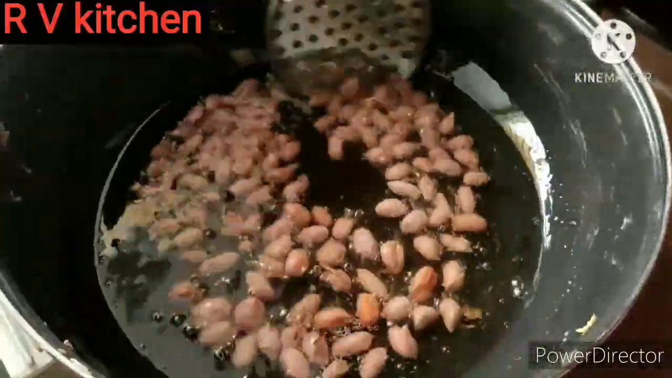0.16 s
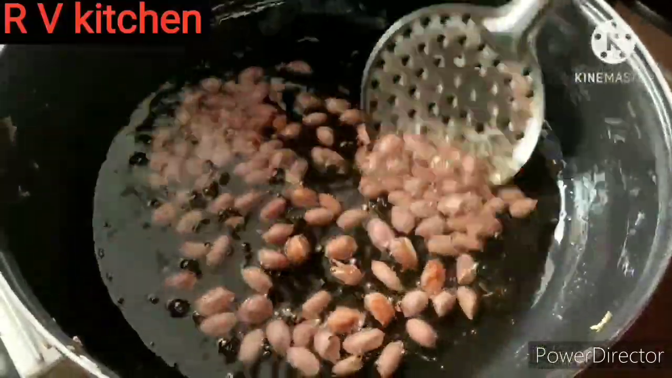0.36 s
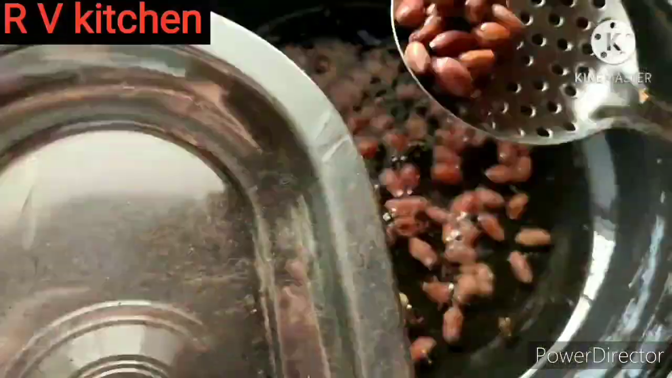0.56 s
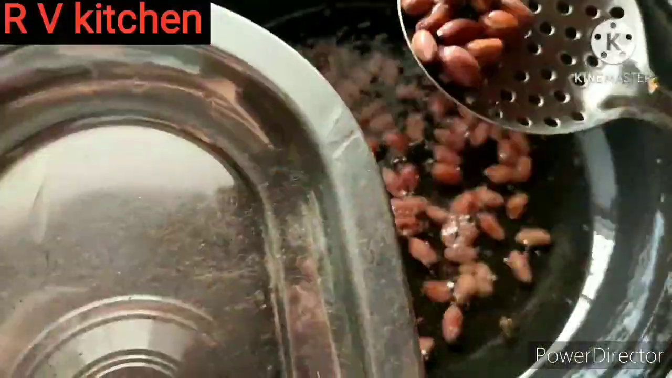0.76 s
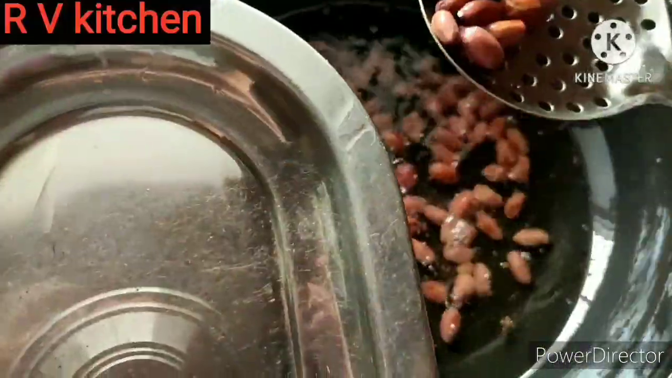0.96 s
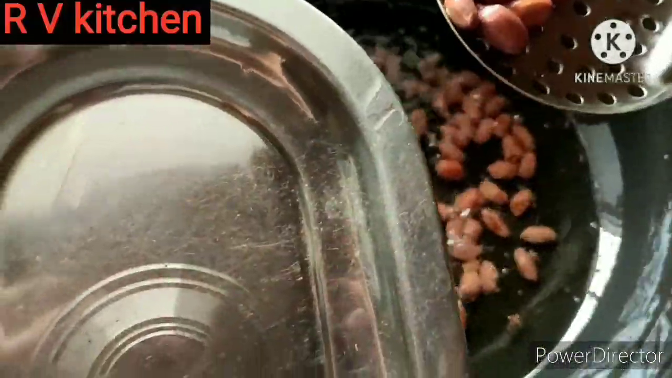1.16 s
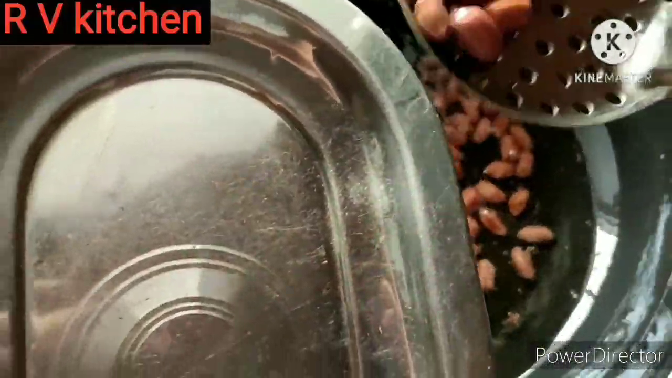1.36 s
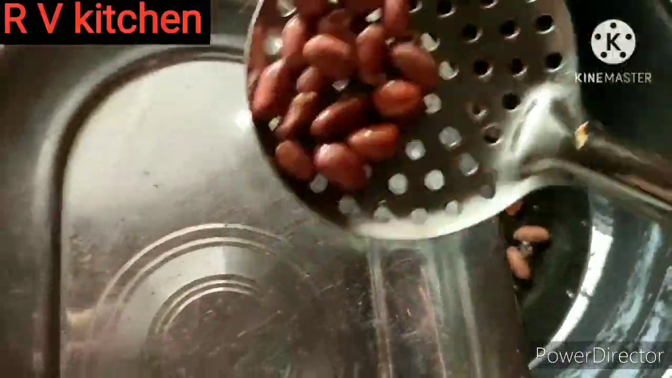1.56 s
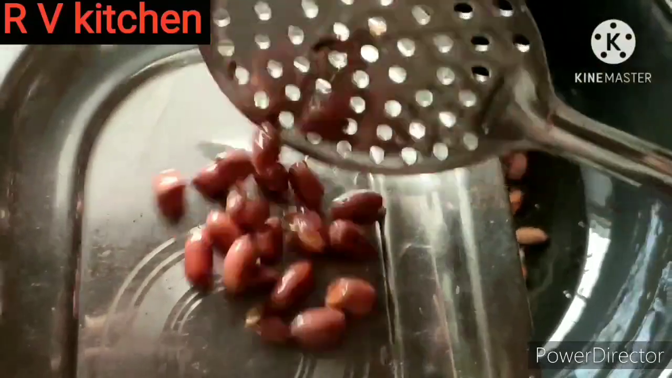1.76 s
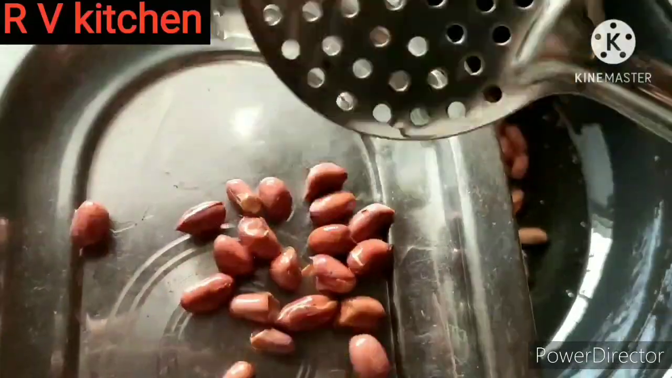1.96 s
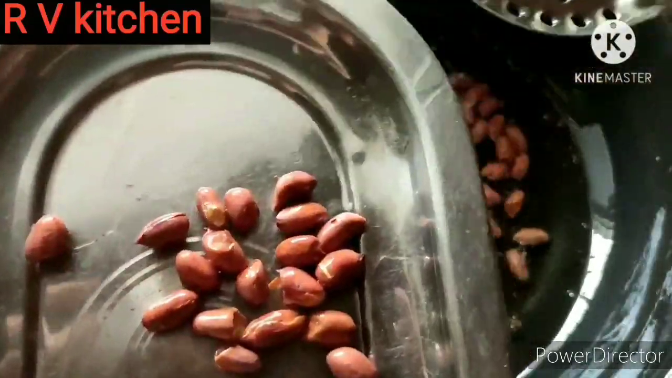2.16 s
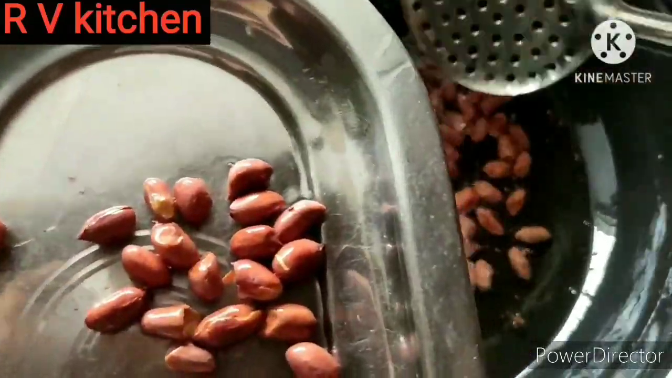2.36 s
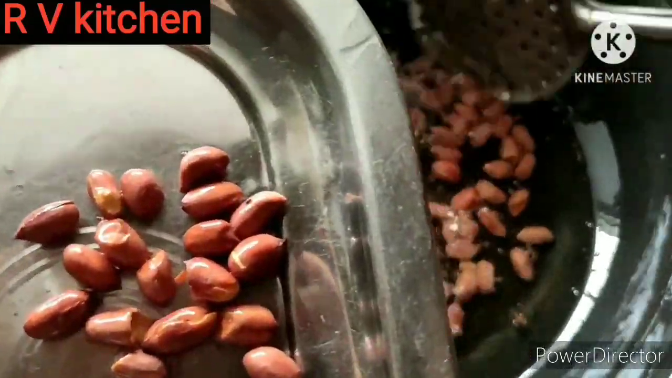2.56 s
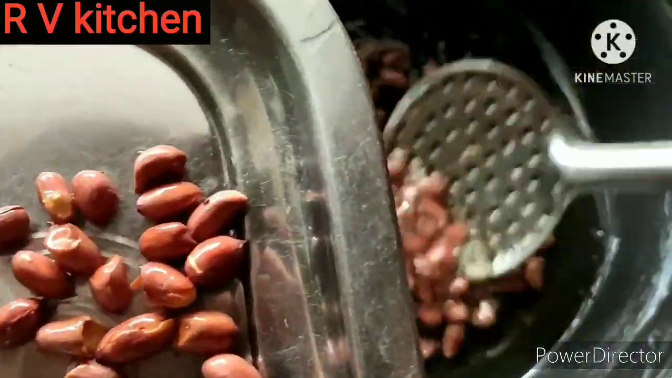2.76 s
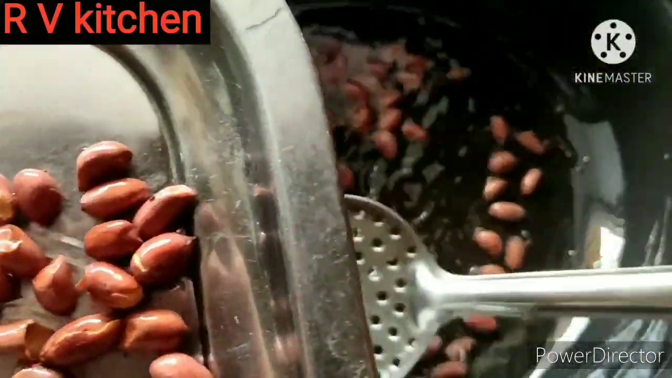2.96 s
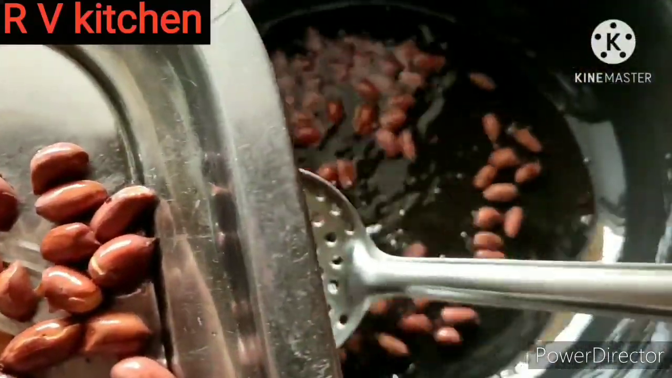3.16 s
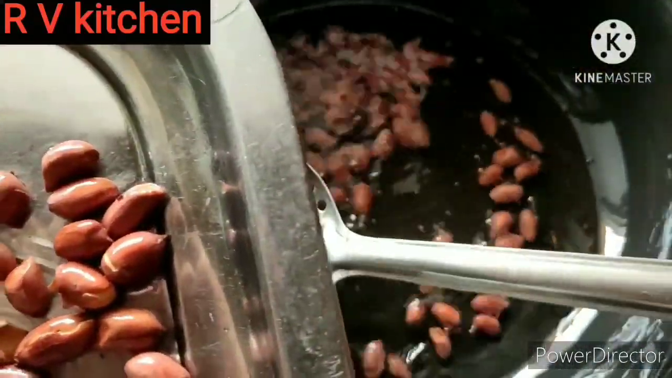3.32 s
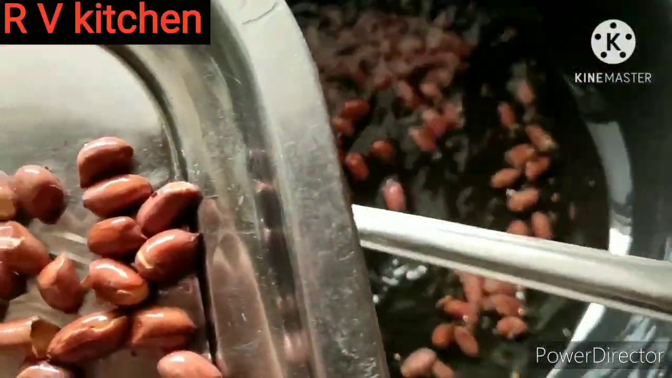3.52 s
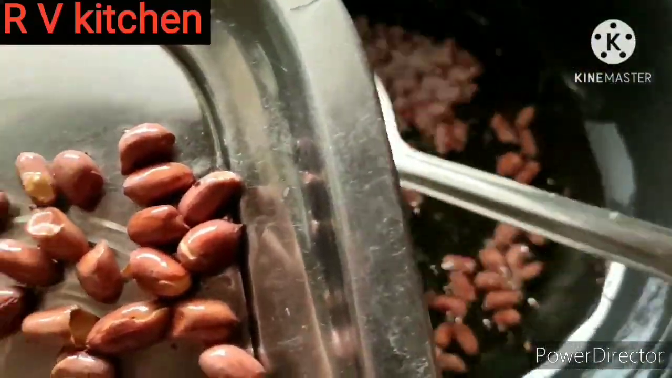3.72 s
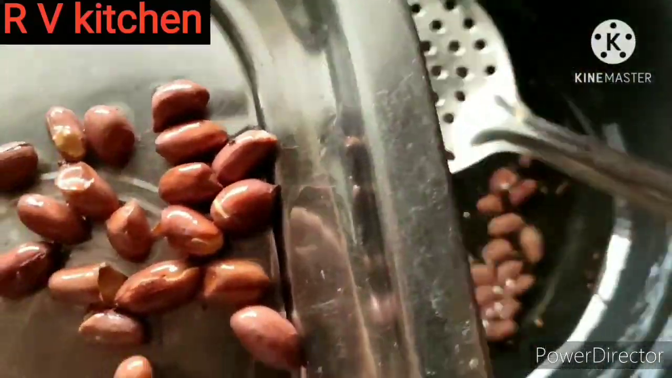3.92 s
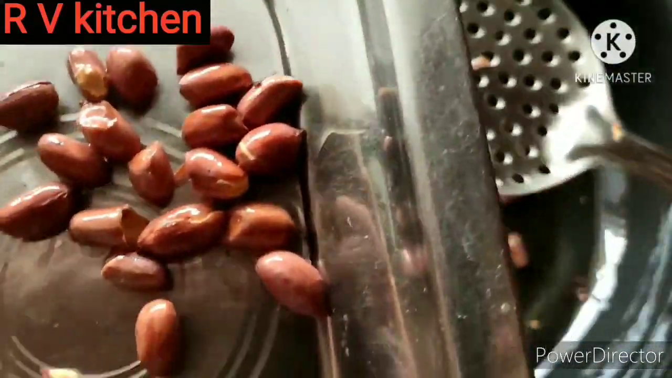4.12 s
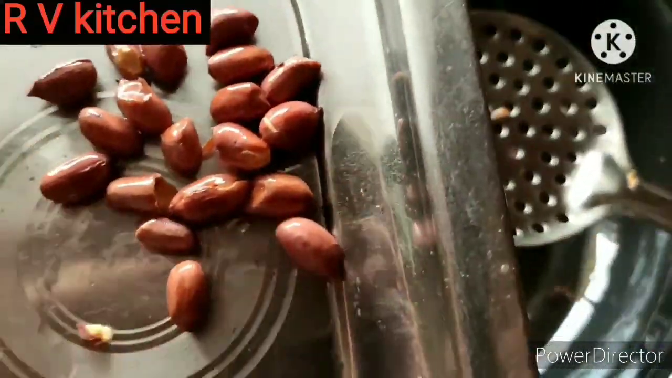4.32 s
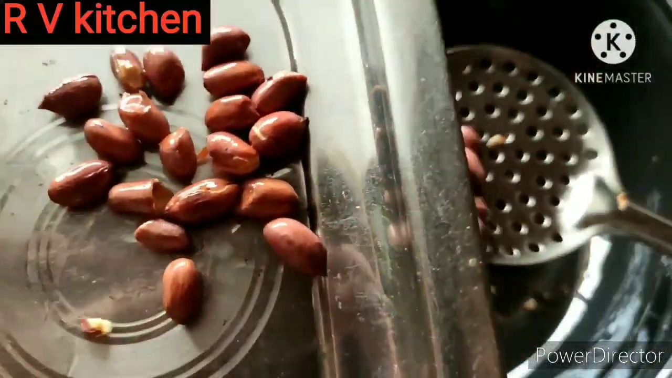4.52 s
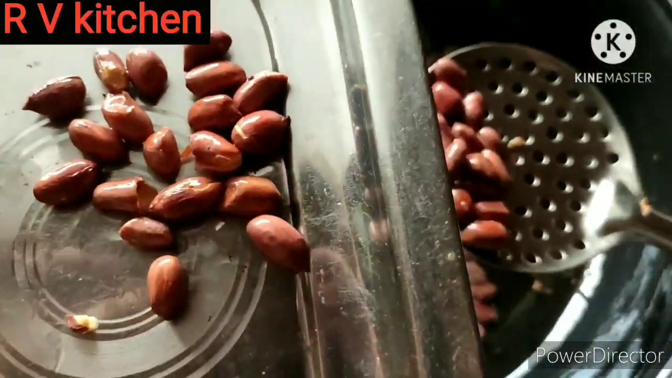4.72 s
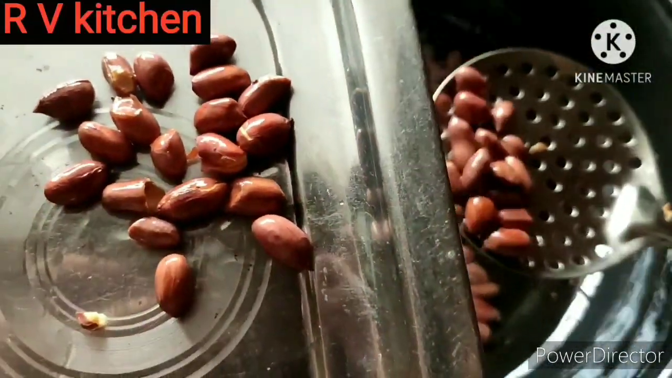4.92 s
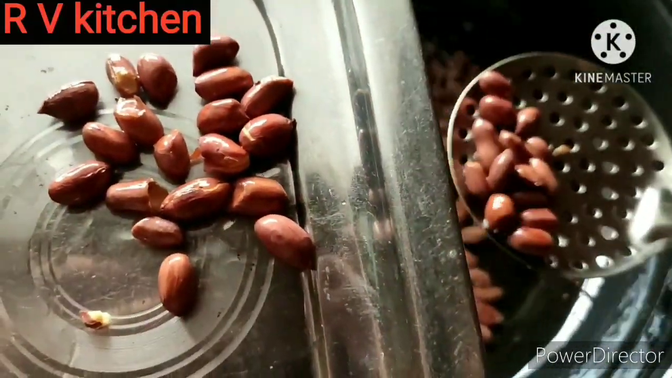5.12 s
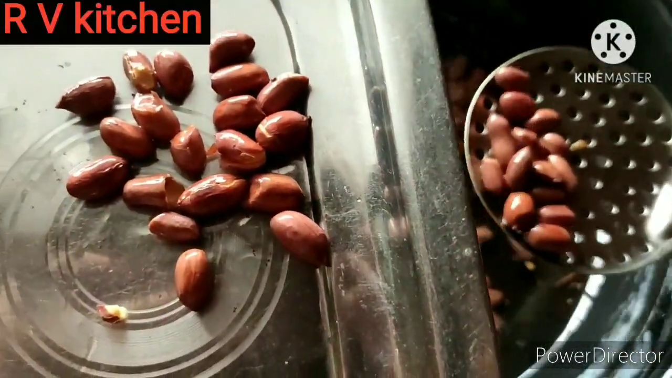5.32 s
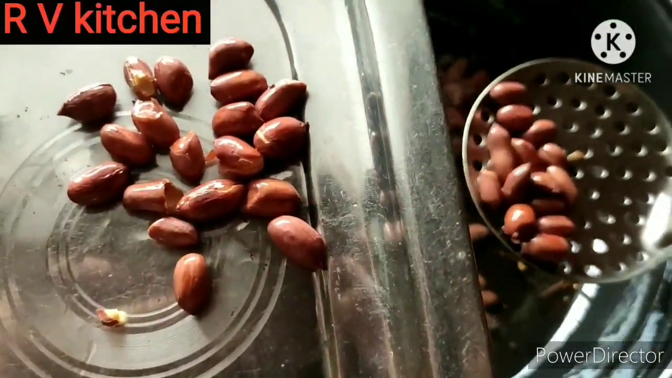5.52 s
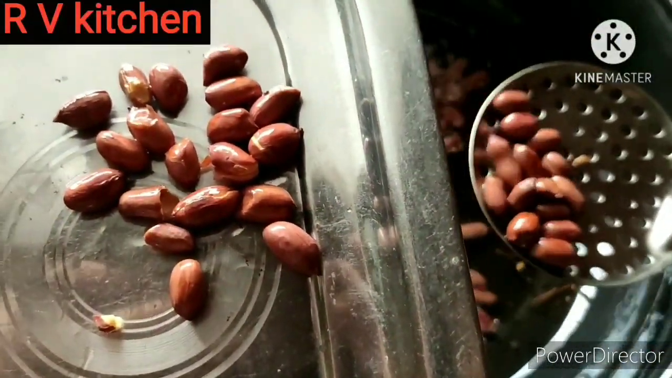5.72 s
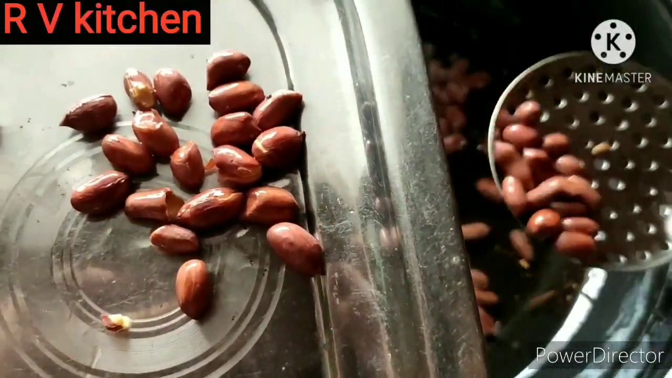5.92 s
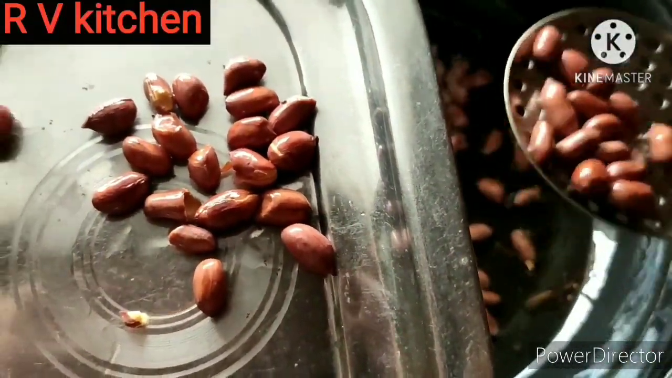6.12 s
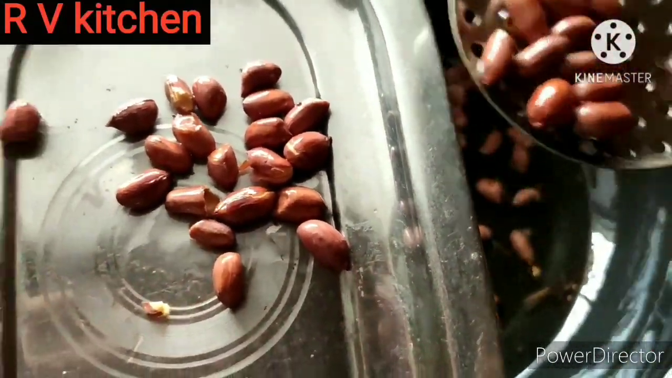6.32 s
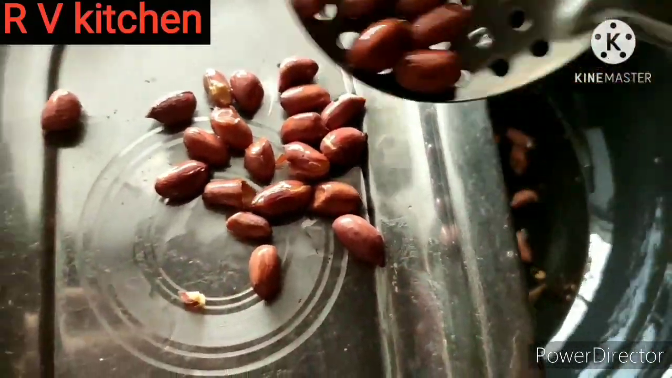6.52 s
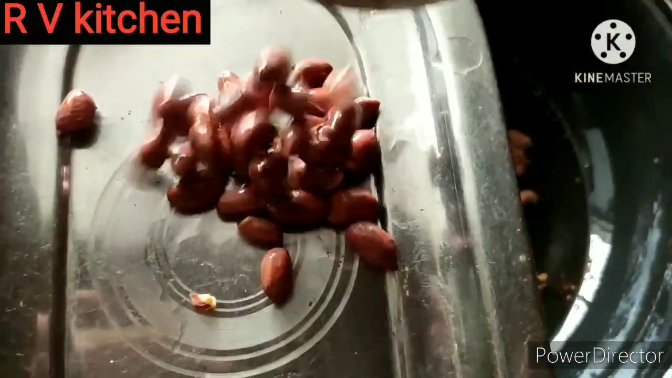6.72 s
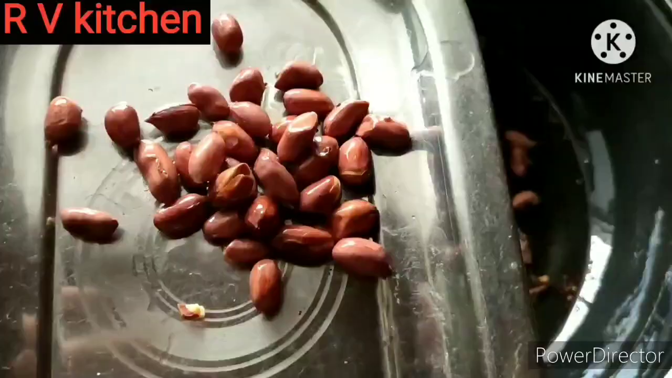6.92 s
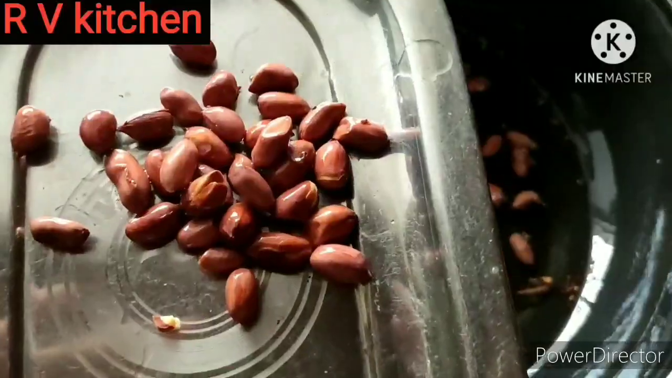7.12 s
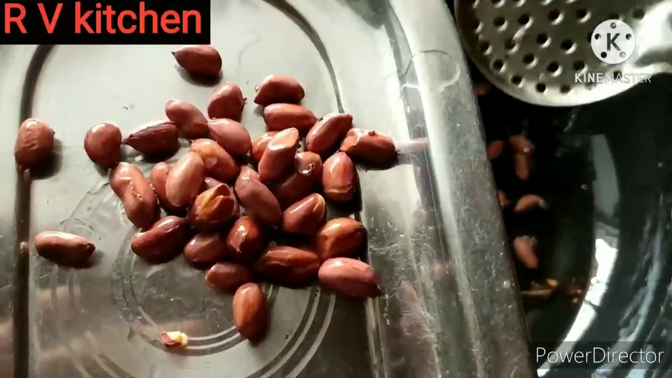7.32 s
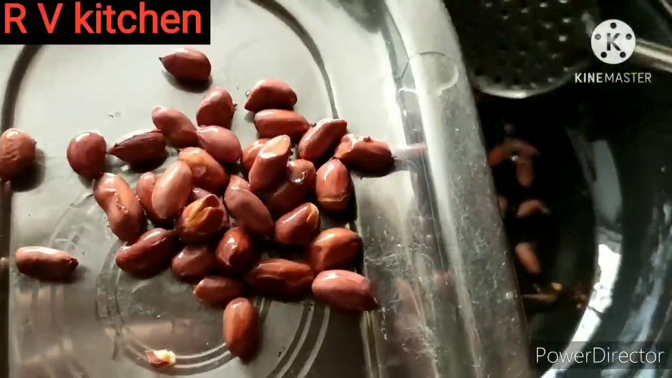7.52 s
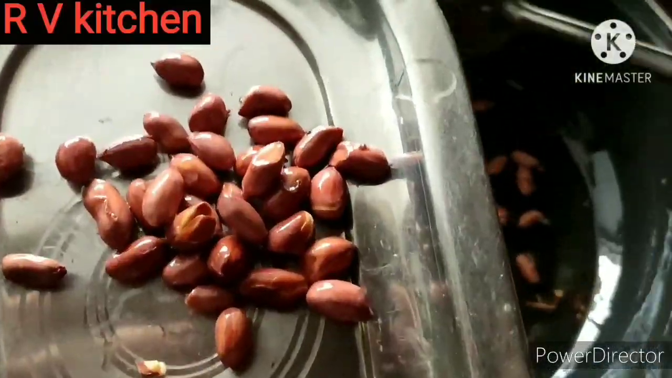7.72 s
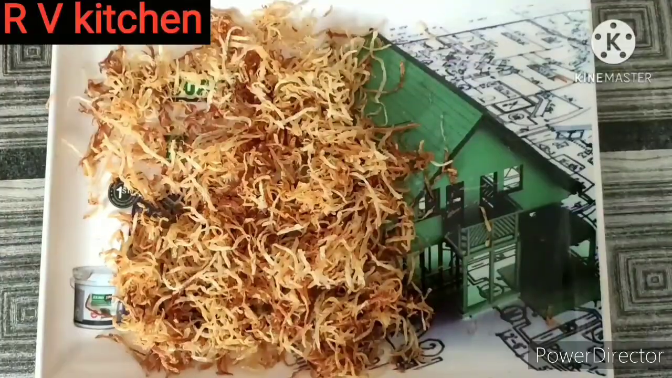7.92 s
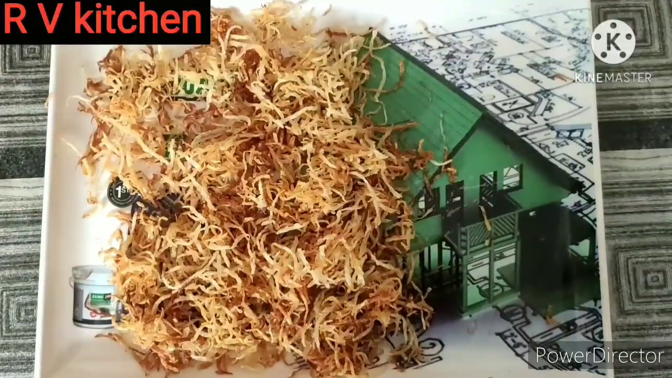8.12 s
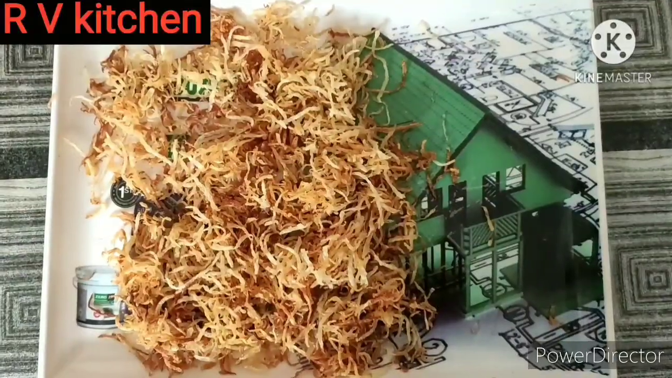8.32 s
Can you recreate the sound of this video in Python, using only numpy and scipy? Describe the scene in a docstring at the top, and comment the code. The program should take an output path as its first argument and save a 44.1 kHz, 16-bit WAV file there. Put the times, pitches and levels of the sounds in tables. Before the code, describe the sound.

Peanuts sizzle in hot oil, close to a hand-held microphone in a kitchen. A slotted steel spoon taps and scrapes the pan, and the sound briefly cuts out. Nuts rattle onto a steel tray. The spoon scrapes again, then scoops in a quick run of ringing clinks before a second spoonful clatters down. The sizzle stops just before the end, leaving a faint hiss and low rumble.

```python
"""Peanuts sizzle in hot oil close to a small stereo microphone, as countless tiny steam bubbles burst.
A slotted steel spoon taps, scrapes and squeaks on the pan, making it ring. Twice it tips nuts onto
a steel tray, where they bounce and rattle. Underneath, the kitchen rumbles and the hand-held
microphone shakes. The sound is muted for a moment, drops out once, and ends in a quieter part
of the kitchen."""
import sys
import numpy as np
from scipy import signal
from scipy.fft import rfft, irfft, next_fast_len
from scipy.io import wavfile
from scipy.ndimage import uniform_filter1d

SR = 44100
rng = np.random.default_rng(int(sys.argv[2]) if len(sys.argv) > 2 else 0)


def persist_wave(psi):
    """Save psi, clipped to +-1, as 16-bit WAV."""
    counts = np.round(np.clip(psi, -1, 1) * 32767).astype(np.int16)
    wavfile.write(sys.argv[1], SR, np.atleast_2d(counts).T)


N = 369116
TIME = np.arange(N) / SR
SCENE_CHANGE_S = 7.89


def gain_of(db):
    """Turn decibels into a number to multiply by."""
    return 10 ** (np.asarray(db) / 20)


def evened(x):
    """Scale a signal to an average power of one."""
    return x / np.sqrt(np.mean(x ** 2) + 1e-20)


def value_at(points, hz):
    """Look up a value between the rows of a frequency table."""
    known_hz, value = np.transpose(points)
    return np.interp(np.log(hz + 1), np.log(known_hz + 1), value)


def level(curves, column=1):
    """Gain over time along curves of seconds and dB, silent outside them."""
    out = np.zeros(N)
    for rows in map(np.array, curves):
        on = slice(*np.searchsorted(TIME, rows[[0, -1], 0]))
        out[on] += gain_of(np.interp(TIME[on], rows[:, 0], rows[:, column]))
    return out


def swell(start, rise, peak_db, start_db, fade_db_per_s):
    """A level curve that starts a little low, climbs to its peak, then fades for half a second."""
    peak_s = start + rise
    return [(start, peak_db + start_db), (peak_s, peak_db), (peak_s + .5, peak_db - .5 * fade_db_per_s)]


def balance(rows):
    """Left and right gains that move a sound from side to side."""
    times, db = np.transpose(rows)
    left = gain_of(np.interp(TIME, times, db) / 2)
    return np.array([left, 1 / left])


def colour(spectrum, size=4096):
    """A filter that shapes the tone, from rows of Hz and dB."""
    log_gain = np.log(gain_of(value_at(spectrum, abs(np.fft.fftfreq(size, 1 / SR)))))
    taps = np.fft.ifft(np.exp(np.conj(signal.hilbert(log_gain)))).real[:size // 2]
    return taps / np.linalg.norm(taps)


def ring(modes, size=2048):
    """A struck object's fading tones (its modes), from rows of Hz, width and dB. Wide ones die fast."""
    t = np.arange(size) / SR
    hz, width, db = np.transpose(modes)[:, :, None]
    taps = (gain_of(db) * width * np.exp(-np.pi * width * t) * np.sin(2 * np.pi * hz * t)).sum(0)
    return taps / np.linalg.norm(taps)


def through(x, taps):
    """Play a sound through a filter or a ringing object."""
    return signal.oaconvolve(x, np.atleast_2d(taps), axes=1)[:, :N]


def above(x, hz):
    """Keep the part of a sound above this frequency."""
    return signal.sosfilt(signal.butter(4, hz, "high", fs=SR, output="sos"), x)


def gritty(per_s, spread_db, hiss):
    """Random clicks of uneven size over a bed of hiss, in stereo."""
    sizes = gain_of(spread_db * np.minimum(rng.exponential(1, N), 5))
    clicks = sizes * (rng.random(N) < per_s / SR)
    puffs = uniform_filter1d(clicks, size=24)  # each lasts half a millisecond
    return (evened(puffs) + hiss) * rng.standard_normal((2, N)) / np.sqrt(1 + hiss ** 2 + hiss)


def bursts(times, level_db, t60, rise):
    """Puffs of noise that build in about rise seconds and fade by 60 dB in t60 seconds."""
    out, t = np.zeros((2, N + 4410)), np.arange(4410) / SR
    puffs = rng.standard_normal((len(times), 2, len(t))) * (1 - np.exp(-t / rise))
    for start, db, puff in zip(times, level_db, puffs):
        out[:, round(start * SR):][:, :len(t)] += puff * gain_of(db - 60 * t / t60)
    return out[:, :N]


def pings(times, level_db, pitch_hz, t60):
    """A short, fading tone for each blow."""
    out, t = np.zeros((2, N + 4096)), np.arange(4096) / SR
    phases = rng.random((len(times), 2)) * 2 * np.pi
    for start, db, hz, phase in zip(times, level_db, pitch_hz, phases):
        tone = np.sin(2 * np.pi * hz * t + phase[:, None]) * (1 - np.exp(-t / 0.00055))
        out[:, round(start * SR):][:, :len(t)] += tone * gain_of(db - 60 * t / t60)
    return out[:, :N]


def patchy(x, depth_db, bins, frames):
    """Make a sound flicker: random patches of its spectrum swell and sink."""
    spectrum = signal.stft(x, SR, nperseg=512)[2]
    noise = rng.standard_normal(spectrum.shape[1:])
    patches = evened(uniform_filter1d(uniform_filter1d(noise, bins, 0), frames, 1))
    flicker = gain_of(depth_db * patches - 0.14 * depth_db ** 2)
    return signal.istft(spectrum * flicker, SR, nperseg=512)[1][:, :N]


def varied(modes, luck, detune, widen, spread_db):
    """The ring from another spot: each tone a little shifted, and louder or softer."""
    hz, width, db = np.transpose(modes)
    return ring(np.transpose([hz * (1 + detune * luck[:, 0]), widen * width, db + spread_db * luck[:, 1]]))


def clinks(times, level_db, modes, detune, widen, spread_db):
    """Each blow lands on a new spot, so it rings its own way in each channel."""
    out = np.zeros((2, N + 2048))
    lucks = rng.standard_normal((len(times), 2, len(modes), 2))
    for start, db, luck in zip(times, level_db, lucks):
        for side in range(2):
            clink = varied(modes, luck[side], detune, widen, spread_db)
            out[side, round(start * SR):][:2048] += gain_of(db) * clink
    return out[:, :N]


def wandering(x, modes, turn_s, detune, widen, spread_db):
    """The point of contact moves about, so three slightly different rings take turns."""
    luck = rng.standard_normal((3, len(modes), 2))
    rings = [varied(modes, spot, detune, widen, spread_db) for spot in luck]
    turns = [np.cos(np.pi * (TIME / turn_s + k / 3)) ** 2 for k in range(3)]
    return sum(through(x * turn, taps) for turn, taps in zip(turns, rings)) / np.sqrt(9 / 8)


# The quiet ending. Each row: time in seconds, hiss in dB, rustle in dB.
CORNER_LEVELS = [(7.891, -41, -55), (7.91, -70, -53), (8.037, -60, -55), (8.131, -64.5, -64),
                 (8.337, -58.5, -80), (8.353, -50, -83), (8.37, -59, -75)]
# The tone of the hiss and of the rustle. Each row: frequency in Hz, level in dB.
HISS_TONE = [(120, -16), (200, -2), (240, -2), (294, -31), (547, -10), (2040, -16), (8000, -9.5),
             (12000, -8), (15000, -14), (16000, -39)]
RUSTLE_TONE = [(500, -15), (1200, -9), (2700, -2.5), (4000, -11), (8000, -20)]


def quiet_corner():
    """A faint hiss and a soft rustle, away from the stove."""
    grit = gritty(per_s=230, spread_db=-7, hiss=3.8)
    hiss = through(grit, colour(HISS_TONE)) * level([CORNER_LEVELS], 1) * gain_of(3)
    rustle = through(grit, colour(RUSTLE_TONE)) * level([CORNER_LEVELS], 2)
    return hiss + rustle


# Deep noises. Each row: time in seconds, then microphone shake, its boom and kitchen rumble in dB.
RUMBLE_LEVELS = [(0.0, -67, -71, -52.5), (0.4, -65, -56.5, -63.5), (1.05, -51.5, -60, -51),
                 (1.32, -45, -83, -52.5), (1.85, -44, -66, -51), (2.2, -50, -59, -52),
                 (2.45, -46, -51, -50.5), (2.7, -50, -60, -54), (3.15, -41, -41.5, -62),
                 (3.45, -49.5, -56, -48.5), (3.9, -41.5, -42.5, -50), (4.2, -52, -49, -48.5),
                 (4.75, -51.5, -62, -54.5), (5.1, -50, -44, -45.5), (6.2, -84, -73.5, -42),
                 (6.6, -55, -66, -54), (7.8, -51, -51.5, -59), (7.92, -53, -62, -64),
                 (8.37, -62.5, -68, -61.5)]
# The tone of the kitchen rumble. Each row: frequency in Hz, level in dB.
RUMBLE_TONE = [(24, -28.5), (40, -4), (81, -11.5), (108, -13.5), (248, -23), (337, -19), (478, -27.5),
               (600, -32.5), (780, -49), (1320, -120)]
# A low hum. Each row: time in seconds, level in dB.
HUM_LEVELS = [(0, -70.5), (2.5, -59.5), (6.6, -59.5), (7.1, -55), (7.7, -50.5), (7.9, -65)]


def rumble():
    """The microphone shakes, the kitchen rumbles and hums; one slow, very deep bump follows the mute."""
    shake, boom, room, hum = rng.standard_normal((4, 2, N))
    shake_tone = [(3, -28.5), (12, 10.5), (30, -2), (50, -37.5), (20000, -100)]
    boom_tone = [(25, -29.5), (50, -4.5), (75, 0.5), (110, -34.5), (20000, -100)]
    shake = through(shake, colour(shake_tone, size=16384)) * level([RUMBLE_LEVELS], 1)
    boom = through(boom, colour(boom_tone, size=16384)) * level([RUMBLE_LEVELS], 2)
    room = through(room, colour(RUMBLE_TONE, size=16384)) * level([RUMBLE_LEVELS], 3)
    hum_swells = gain_of(-14.5) * scoops(DRONE) * (TIME < SCENE_CHANGE_S)  # one with each scoop
    hum = through(hum * (level([HUM_LEVELS]) + hum_swells), ring([(109.3, 8.6, 0)], size=16384))
    bump_progress = np.clip((TIME - .945) / .26, 0, 1)
    bump = gain_of(-35) * np.sin(np.pi * bump_progress ** .6)
    return bump + shake + boom + room + hum


# Two moans, after the first taps and near the end. Each row: time in seconds, level in dB.
MOAN_CURVES = [
    [(.165, -34), (.28, -43), (.31, -46.5), (.61, -71)],
    [(7.62, -56.5), (7.7, -40), (7.77, -34.5), (7.89, -39)],
]


def moan():
    """Noise rings at two low, close pitches and makes a soft moan."""
    noise = rng.standard_normal((2, N)) * level(MOAN_CURVES)
    return through(noise, ring([(245, 12, 0.0091), (202.5, 10, 0.01)]))


# Single nuts landing. Each row: start in seconds, blow in dB, tick in dB over the blow, ping in Hz.
NUT_LANDINGS = [(1.872, -16.5, 4.5, 3050), (1.8814, -14, -6, 810), (1.888, -9, -15, 2290),
                (1.8918, -25, -13, 2240), (1.8955, -12, -16, 3180), (1.9035, -13, -12, 3060),
                (1.9155, -18.5, 5, 840), (1.9351, -17, -1, 860), (1.9584, -16.5, -18, 1390),
                (1.989, -16, -28, 1430), (2.0082, -27, -23, 760), (2.0253, -19.5, -18, 710),
                (2.0495, -16, -3.5, 5740), (2.084, -25, -21, 2270), (2.1298, -27.5, -11, 1400),
                (6.8777, -15, -5, 770), (6.89, -18, 4.5, 1510), (6.91, -16, -7, 1600),
                (6.933, -16, -7, 2220), (6.9504, -14, 0.5, 2220), (6.9618, -15.5, -10, 2960),
                (6.978, -23, -12, 2190), (7.0115, -24, -17, 790), (7.0175, -22, -11, 2960),
                (7.031, -34, 6, 3030), (7.059, -41, -8.5, 3030), (7.1305, -26.5, -14, 795)]
# Nuts pouring out. Each row: start in seconds, rise in seconds, peak in dB, fade in dB per second.
NUT_POURS = [(1.871, 0.035, -16.5, 246), (1.992, 0.0077, -33, 128), (6.87, 0.076, -26.5, 119)]
# The tray's ringing tones. Each row: pitch in Hz, width in Hz, level in dB.
TRAY_MODES = [(363, 42, 3.5), (740, 13, -4), (870, 75, -3), (1340, 32, -31), (1400, 12, 5),
              (1810, 43, -4.5), (2260, 13, 5.5), (2404, 12, 7), (2630, 19, -8), (2920, 22, -3.5),
              (3080, 39, 1), (3420, 29, -1), (3410, 36, -4.5), (4050, 43, -3), (4730, 30, -5),
              (4800, 45, -22.5), (5600, 110, -12)]
# A nut's knock on the bare tray and among other nuts. Each row: frequency in Hz, level in dB.
BARE_CLACK_TONE = [(180, -49), (300, -12), (711, -13), (1230, 10), (1380, 19.5), (1860, -1.5), (3060, -0.5),
                   (11000, -21.5), (15800, -44)]
LOADED_CLACK_TONE = [(180, -53), (300, -8), (780, 10), (1230, 4.5), (2200, 3), (3500, -5), (11000, -22),
                     (15800, -43.5)]
# One tray tone that keeps ringing. Each row: time in seconds, level in dB.
LINGER_LEVELS = [(7.02, -42), (7.03, -35), (7.075, -47), (7.085, -60)]


def nuts_on_tray():
    """Each nut knocks the thin steel, which rings briefly; hard landings add a tick."""
    times, blow_db, tick_db, ping_hz = np.transpose(NUT_LANDINGS)
    blows = bursts(times, blow_db, t60=.022, rise=0.0021)
    pours = [swell(start, rise, db, -9, fade) for start, rise, db, fade in NUT_POURS]
    rattle = gritty(per_s=760, spread_db=4.5, hiss=2.3) * level(pours)
    ticks = bursts(times, blow_db + tick_db, t60=.03, rise=0.0016) + gain_of(-9) * rattle
    ticks = through(ticks, colour([(2000, -20.5), (4500, -6), (9000, -9), (15000, -13), (16000, -59)]))
    loaded = TIME > NUT_POURS[-1][0] - .5  # the second spoonful lands among the first
    steel = gain_of(-.5) * through((blows + rattle) * ~loaded, colour(BARE_CLACK_TONE))
    steel += gain_of(-5) * through((blows + rattle) * loaded, colour(LOADED_CLACK_TONE))
    bare_ring = wandering(rattle * ~loaded, TRAY_MODES, turn_s=.045, detune=.012, widen=1.9, spread_db=4)
    full_ring = wandering(rattle * loaded, TRAY_MODES, turn_s=.044, detune=.041, widen=1.9, spread_db=1.5)
    steel += gain_of(-3) * bare_ring + gain_of(-6) * full_ring
    steel += clinks(times, blow_db + 13, TRAY_MODES, detune=.015, widen=1.9, spread_db=7)
    steel += pings(times, blow_db - 1.5, ping_hz, t60=.029)
    steel += through(rng.standard_normal((2, N)) * level([LINGER_LEVELS]), ring([(1310, 25, 0)]))
    thuds = bursts(times, blow_db - 7.5, t60=.03, rise=0.0026)
    steel += through(thuds, ring([(830, 77, 0.0045), (950, 68, -1.8)]))
    steel = above(above(steel, 340), 404)  # thin steel gives off little bass
    return steel * gain_of([[-1.5], [1.5]]) + ticks * gain_of([[1.2], [-1.2]])


# The spoon's squeak. Each row: time in seconds, pitch in Hz, tone in dB, its octave in dB.
SQUEAK_CURVE = [(0.29, 805, -55, -65.5), (0.301, 822, -35, -73), (0.405, 860, -45, -37),
                (0.454, 794, -46.5, -60), (0.504, 863, -55, -32), (0.56, 830, -53.5, -70)]


def squeak():
    """The spoon's edge sticks and slips unevenly, giving a fuzzy tone and its octave."""
    times, hz = np.transpose(SQUEAK_CURVE)[:2]
    cycles = np.cumsum(np.interp(TIME, times, hz)) / SR
    wobble = evened(uniform_filter1d(uniform_filter1d(rng.standard_normal((2, 2, N)), 400), 400))
    tone, octave = (1 + 1.4 * wobble) * np.sin(2 * np.pi * np.array([cycles, 2 * cycles]))[:, None]
    return tone * level([SQUEAK_CURVE], 2) + octave * level([SQUEAK_CURVE], 3)


# Knocks on the pan's wall. Each row: start in seconds, lower tone in dB, upper tone in dB.
WALL_KNOCKS = [(4.837, -41, -32), (4.854, -22, -16.5), (4.928, -28, -41), (5.027, -26, -25),
               (5.209, -23, -17), (5.365, -27, -40), (5.609, -24, -17), (5.619, -17, -18.5),
               (5.769, -41, -28), (5.808, -24.5, -40.5), (5.957, -24.5, -26), (6.154, -25, -13),
               (6.165, -23, -22), (6.184, -24.5, -23)]
# The wall's two tones. Each row: pitch in Hz, seconds to fade by 60 dB.
WALL_MODES = [(400, 0.16), (885, 0.049)]


def wall_knocks():
    """The spoon knocks the pan's wall, which rings hollow, a little off pitch each time."""
    times, *levels_db = np.transpose(WALL_KNOCKS)
    detunes = 1 + 0.025 * rng.standard_normal((len(times), 2))
    return sum(pings(times, db, hz * detune, t60)
               for db, (hz, t60), detune in zip(levels_db, WALL_MODES, detunes.T))


# Nuts touching the spoon. Each row: start in seconds, level in dB.
NUT_CLICKS = [(4.886, -26), (4.9181, -22), (5.031, -17), (5.062, -20.5), (5.0952, -21), (5.2099, -21),
              (5.3466, -32), (5.412, -17), (5.5354, -30), (5.6103, -12), (6.0236, -20.5), (6.1523, -18),
              (6.2193, -19)]


def nut_clicks():
    """Nuts click against the spoon as it lifts them."""
    times, db = np.transpose(NUT_CLICKS)
    clicks = bursts(times, db, t60=.02, rise=.0005)
    return through(above(clicks, 4900), colour(RASP_TONE)) * balance(SPOON_BALANCE)


RASP, DRONE, UPPER = 0, 1, 2  # a scrape's layers: steel rasp, the pan's low drone, its upper tones
# Short scoops through the nuts. Each row: start and rise in seconds, then each layer's peak in dB.
SPOON_SCOOPS = [(4.594, 0.039, -41.5, -52, -66), (4.822, 0.031, -31.5, -26, -27.5),
                (4.997, 0.034, -30.5, -30, -33.5), (5.176, 0.033, -32, -24.5, -28.5),
                (5.359, 0.04, -32, -28, -34.5), (5.577, 0.033, -27, -24.5, -22),
                (5.74, 0.03, -30.5, -25.5, -32), (5.922, 0.033, -29, -25, -26.5),
                (6.119, .034, -26, -23, -22), (7.729, 0.02, -36.5, -38, -37.5),
                (7.808, 0.036, -41, -44, -63), (7.858, 0.038, -40.5, -35, -43)]
# One number for each layer: its start in dB against the peak, and its fade in dB per second.
LAYER_START_DB = [-6.5, -15.5, -16.5]
LAYER_FADE_DB_PER_S = [135, 115, 133]


def scoops(layer):
    """How one layer swells and fades as the spoon pushes through the nuts."""
    return level([swell(start, rise, peaks_db[layer], LAYER_START_DB[layer], LAYER_FADE_DB_PER_S[layer])
                  for start, rise, *peaks_db in SPOON_SCOOPS])


def clunks(layer):
    """The spoon digs in with a clunk at the peak of each scoop."""
    start, rise, *peaks_db = np.transpose(SPOON_SCOOPS)
    over_peak_db = (0, -11, 6)[layer]
    return bursts(start + rise, peaks_db[layer] + over_peak_db, t60=.049, rise=0.0012)


# The pan's low and upper ringing tones. Each row: pitch in Hz, width in Hz, level in dB.
PAN_LOW_MODES = [(240.8, 4.65, 9.5), (324.5, 26, -9), (406.6, 37, -1), (473, 48, -7.5), (597.6, 3.8, 2)]
PAN_UPPER_MODES = [(733, 8.3, -17), (884, 74, 6.5), (1037.5, 40, 2), (1211, 71, 3), (1714, 11.4, 5)]


def pan_ring(drone, upper):
    """The oil-filled pan answers the spoon with ringing tones on top of a broad, dull sound."""
    low_body = colour([(40, -36.5), (90, -38), (190, 16), (450, 0.5), (700, -19), (20000, -82.5)])
    high_body = colour([(400, -18.5), (650, -1.5), (1500, -10), (2600, -13), (20000, -64)])
    low = gain_of(-4) * ring(PAN_LOW_MODES) + gain_of(-12.5) * low_body
    high = gain_of(-6) * ring(PAN_UPPER_MODES) + gain_of(-7) * high_body
    return through(drone, low) + through(upper, high) * gain_of([[-1.2], [1.2]])


# Taps on the pan. Each row: start in seconds, then crack, low thump and upper tones in dB.
SPOON_TAPS = [(0.1629, -5, -25.5, -20), (0.1778, -4.5, -29, -39), (2.6365, -8, -16, -14),
              (3.928, -31.5, -36.5, -30.5), (3.9852, -34, -38, -45), (4.6226, -28.5, -52, -45),
              (4.816, -10, -20, -19.5), (4.9943, -14, -21.5, -45), (5.1716, -13, -18, -34),
              (5.36, -14.5, -23.5, -27), (5.5706, -8.5, -18, -17.5), (5.7399, -10, -19, -15.5),
              (5.9209, -11.5, -16, -18.5), (6.116, -7, -15, -12), (7.7276, -18.5, -33, -23),
              (7.7862, -17.5, -39, -28), (7.8098, -24.5, -25, -31)]
# Two long drags, one curve each. Each row: time in seconds, then rasp, drone and treble in dB.
SPOON_DRAGS = [
    [(0.19, -30, -39, -41), (0.224, -38.5, -45, -43), (0.243, -32, -45, -30), (0.258, -30, -49, -18.5),
     (0.295, -33.5, -42, -23.5), (0.326, -34, -47, -39), (0.518, -33.5, -44, -50), (0.612, -46, -47.5, -57)],
    [(2.645, -31, -24, -11), (2.672, -28, -28, -24), (2.687, -33, -35, -26), (2.841, -39.5, -35.5, -34.5),
     (2.953, -33, -35.5, -28.5), (3.011, -39.5, -35, -40), (3.245, -45, -50.5, -45), (3.55, -47, -56, -38),
     (3.68, -72, -75, -45)],
]
# One number for each drag: the pan's upper tones in dB against its drone.
UPPER_OVER_DRONE_DB = [3.5, -2]
# The tone of scraping steel. Each row: frequency in Hz, level in dB.
RASP_TONE = [(710, -22.5), (1200, -4.5), (1550, -7.5), (1730, -2.5), (3340, -2), (4190, -6.5), (5370, -2.5),
             (5860, -1), (10300, -3.5), (14700, -12.5), (15800, -37)]
# The spoon's ringing tones. Each row: pitch in Hz, width in Hz, level in dB.
SPOON_MODES = [(3035, 17, 5), (4235, 42, 5), (4930, 76, 2.5), (5490, 39, -1.5), (6100, 310, -11),
               (6460, 33, -5.5), (7170, 51, 1.5), (8100, 24, -9), (8540, 420, -30), (10450, 260, -3)]
# Where the spoon is heard. Each row: time in seconds, left minus right in dB.
SPOON_BALANCE = [(0, -2), (.6, -3), (2.6, 2.5), (4.8, 4), (6.3, 2.5), (7.8, 3.5)]


def spoon():
    """Taps, drags and scoops make the steel spoon rasp and clink, and set the pan droning."""
    times, crack_db, thump_db, upper_db = np.transpose(SPOON_TAPS)
    cracks = bursts(times, crack_db - 10, t60=.081, rise=0.0012)
    cracks += bursts(times, crack_db - 1.5, t60=.012, rise=0.00043)  # the first snap
    cracks = gain_of(-4.5) * cracks + gain_of(2) * above(cracks, 3300)  # a blow is brighter than a drag
    rasp = cracks + clunks(RASP)
    rasp += gritty(per_s=1500, spread_db=-4.5, hiss=7.5) * (level(SPOON_DRAGS, 1) + scoops(RASP))
    steel = gain_of(-.5) * through(rasp, colour(RASP_TONE))
    steel += gain_of(-7.5) * wandering(rasp, SPOON_MODES, turn_s=.31, detune=.05, widen=2.5, spread_db=5)
    treble = gritty(per_s=840, spread_db=1, hiss=2.8) * level(SPOON_DRAGS, 3)
    steel += through(above(treble, 6000), colour(RASP_TONE))
    grit = gritty(per_s=400, spread_db=2, hiss=3.5)
    drone = bursts(times, thump_db, t60=.081, rise=0.0086) + clunks(DRONE)
    drone += grit * (level(SPOON_DRAGS, 2) + scoops(DRONE))
    upper = bursts(times, upper_db, t60=.043, rise=0.0018) + clunks(UPPER)
    upper_drags = sum(level([drag], 2) * gain_of(db) for drag, db in zip(SPOON_DRAGS, UPPER_OVER_DRONE_DB))
    upper += grit * (upper_drags + scoops(UPPER))
    steel = patchy(steel, depth_db=3, bins=5, frames=6)  # sliding keeps shifting the ring
    steel += clinks(times, crack_db + 11, SPOON_MODES, detune=.06, widen=0.6, spread_db=6)
    return above(steel, 830) * balance(SPOON_BALANCE) + pan_ring(drone, upper)


# The oil's larger spits. Each row: start in seconds, level in dB.
OIL_SPITS = [(1.0335, -37), (1.0706, -26), (1.1069, -31), (1.2376, -28), (1.3789, -31), (1.4133, -30),
             (1.4427, -28), (1.6083, -33), (1.6594, -29), (1.8144, -28), (2.2633, -24), (2.4674, -41),
             (3.0935, -34), (3.111, -23.5), (3.7644, -32), (4.241, -27), (6.5383, -27.5), (7.3804, -27),
             (7.6233, -32)]
POPS_PER_S, POP_DB, POP_SPREAD_DB = 22, -35, 2.5


def spits():
    """The oil spits sharply now and then, with small pops at random moments."""
    times, db = np.transpose(OIL_SPITS)
    large = above(bursts(times, db, t60=.025, rise=0.00066), 4800)
    when, size = rng.random((round(POPS_PER_S * N / SR), 2)).T
    pops = bursts(when * N / SR, POP_DB + POP_SPREAD_DB * (2 * size - 1), t60=.02, rise=0.001)
    spatter = through(large + above(pops, 5500), colour(SIZZLE_TONE))
    return patchy(spatter, depth_db=4, bins=30, frames=2)


# Two swells of fizz, one curve each. Each row: time in seconds, level in dB.
FIZZ_CURVES = [
    [(3.55, -54), (3.69, -40.5), (3.77, -39), (3.8, -62)],
    [(4.14, -62), (4.2, -39), (4.25, -47), (4.32, -60)],
]


def fizz():
    """The oil's fizz swells briefly in the high treble."""
    bubbles = gritty(per_s=600, spread_db=-7, hiss=2) * level(FIZZ_CURVES)
    return through(bubbles, colour([(5000, -23), (9000, -1), (11500, 2), (14000, -11), (16000, -46)]))


# How loud the sizzle is. Each row: time in seconds, level in dB.
SIZZLE_LEVELS = [(0.0, -34.5), (0.13, -35.5), (0.998, -41.5), (1.8, -41.5), (2.58, -39.5), (3.1, -43.5),
                 (3.4, -43), (3.76, -42), (3.87, -41.5), (4.14, -41.5), (4.3, -41.5), (4.6, -41.5),
                 (4.75, -39), (6.3, -43.5), (6.8, -42), (7.7, -43.5)]
# The tone of the sizzle. Each row: frequency in Hz, level in dB.
SIZZLE_TONE = [(180, -29.5), (300, -17.5), (391, -12.5), (425, -18.5), (563, -13.5), (602, -3), (1110, -6),
               (1210, -6.5), (1360, -6.5), (2720, 4), (4500, 4.5), (7000, 5.5), (11200, 7.5), (15000, 4),
               (15800, -24)]
# Where the sizzle is heard. Each row: time in seconds, left minus right in dB.
SIZZLE_BALANCE = [(0, -2), (1.2, 2), (2.2, 2), (4, 3.5), (7.7, 2)]


def sizzle():
    """Countless tiny steam bubbles burst in the oil and blend into a finely flickering hiss."""
    hiss = through(gritty(per_s=130, spread_db=1, hiss=6.1), colour(SIZZLE_TONE))
    hiss = patchy(hiss, depth_db=1.6, bins=8, frames=4)  # quick, narrow flicker
    hiss = evened(patchy(hiss, depth_db=.8, bins=70, frames=24))  # slow, broad flicker
    held_to_end = SIZZLE_LEVELS + [(N / SR, SIZZLE_LEVELS[-1][1])]
    return hiss * level([held_to_end]) * balance(SIZZLE_BALANCE)


# How alike left and right are. Each row: frequency in Hz, likeness (1 is the same, 0 is unrelated).
STEREO_LIKENESS = [(60, 0.91), (180, 0.97), (400, 0.91), (700, 0.67), (1650, -0.087), (4970, 0.078),
                   (15000, -0.11)]


def scene():
    """Shortly before the end the scene changes to a quieter part of the kitchen, where the stove is no longer
    heard. Both sides hear much the same bass but their own treble."""
    stove = sizzle() + spits() + fizz() + spoon() + wall_knocks() + nut_clicks()
    stove += squeak() + moan() + nuts_on_tray()
    stove *= np.clip((SCENE_CHANGE_S - TIME) / 0.003 + 1, 0, 1)
    size = next_fast_len(N)
    left, other = rfft(stove + rumble() + quiet_corner(), size)
    likeness = np.clip(value_at(STEREO_LIKENESS, np.fft.rfftfreq(size, 1 / SR)), -1, 1)
    right = likeness * left + np.sqrt(1 - likeness ** 2) * other
    return irfft(np.array([left, right]), size)[:, :N]


# A mute and a short dropout. Each row: start, end, fade out and fade in, all in seconds, depth in dB.
DROPOUTS = [(.613, .939, .014, .005, -120), (7.789, 7.8095, .002, .002, -32)]
PEAK_LIMIT, TREBLE_LIMIT_HZ = .88, 16800


def record(dry):
    """The sound cuts out twice, any loud peaks are clipped, and the highest treble is removed."""
    gate = np.ones(N)
    for start, end, fade_out, fade_in, db in DROPOUTS:
        ramp = np.maximum((start - TIME) / fade_out, (TIME - end) / fade_in) + 1
        gate *= np.clip(ramp, gain_of(db / 2), 1) ** 2
    clipped = np.clip(dry * gate, -PEAK_LIMIT, PEAK_LIMIT)
    lowpass = signal.firwin(511, TREBLE_LIMIT_HZ, window=("kaiser", 9), fs=SR)
    return signal.oaconvolve(clipped, lowpass[None], "same")


dry = scene()
out = record(dry)
persist_wave(out)
```